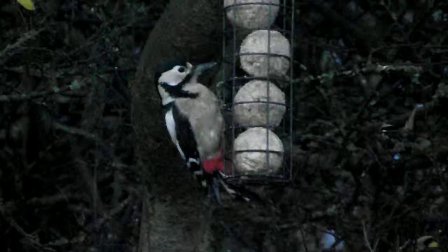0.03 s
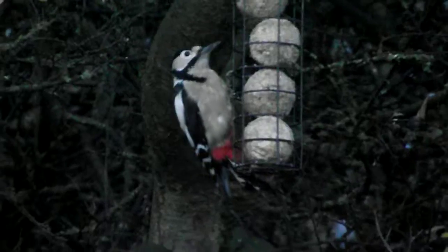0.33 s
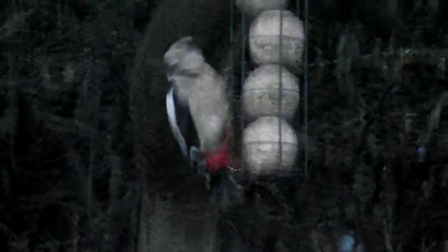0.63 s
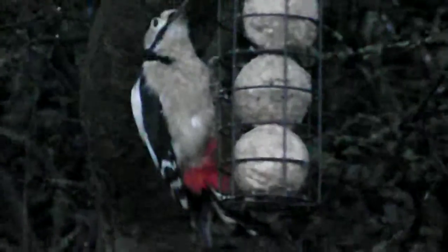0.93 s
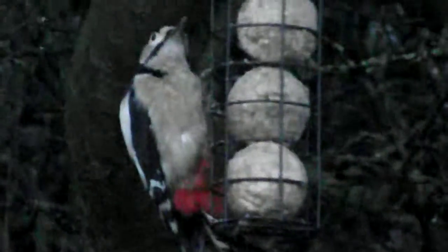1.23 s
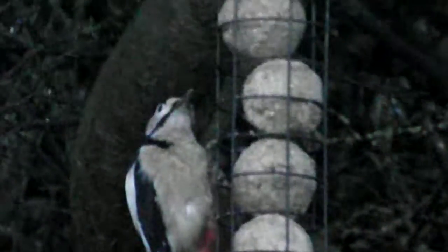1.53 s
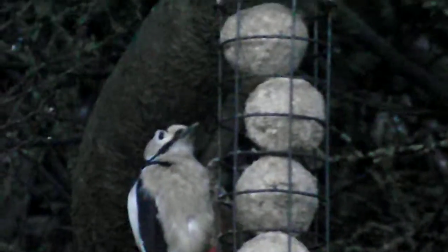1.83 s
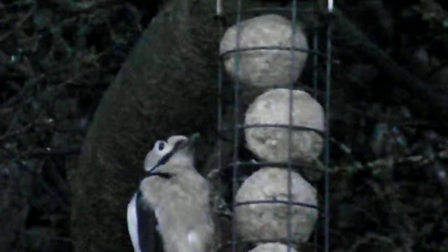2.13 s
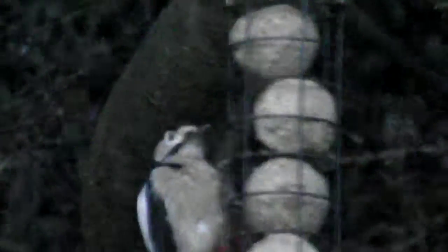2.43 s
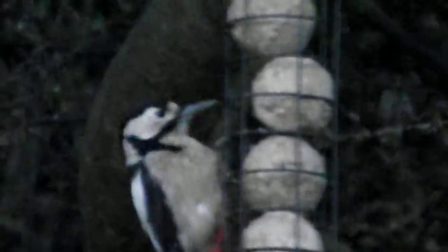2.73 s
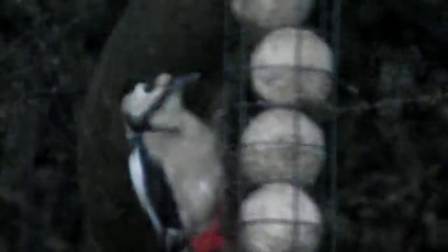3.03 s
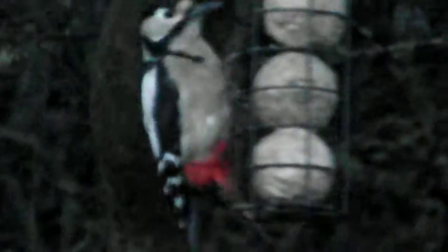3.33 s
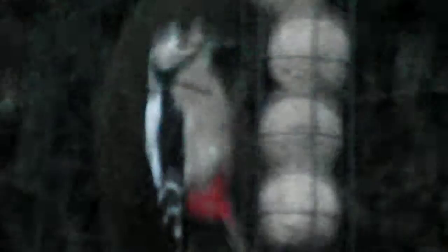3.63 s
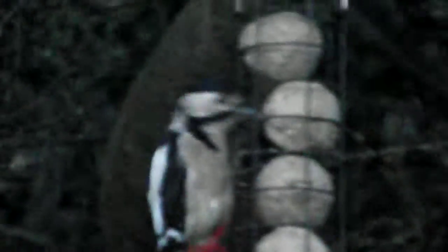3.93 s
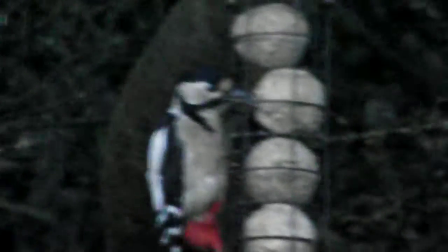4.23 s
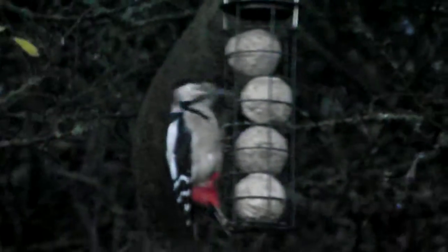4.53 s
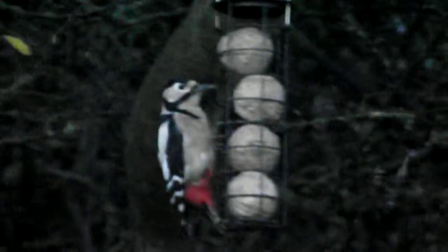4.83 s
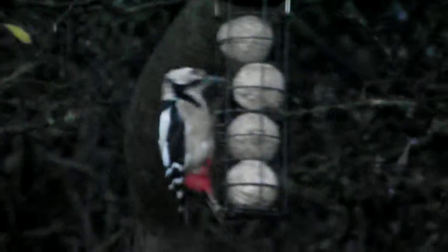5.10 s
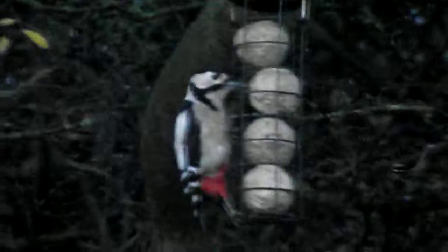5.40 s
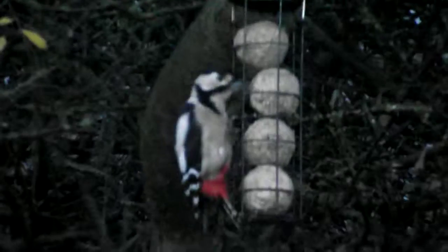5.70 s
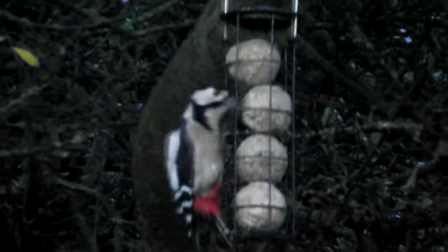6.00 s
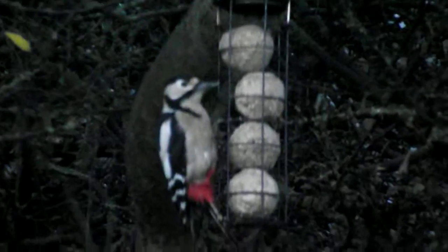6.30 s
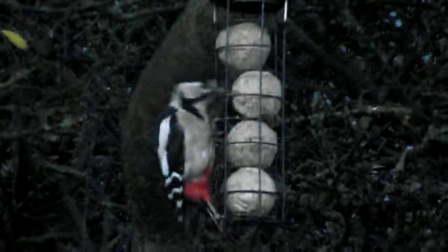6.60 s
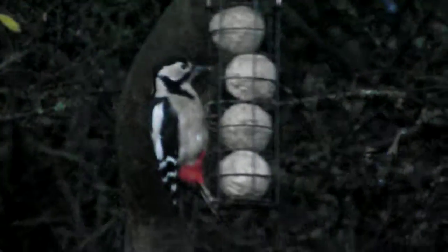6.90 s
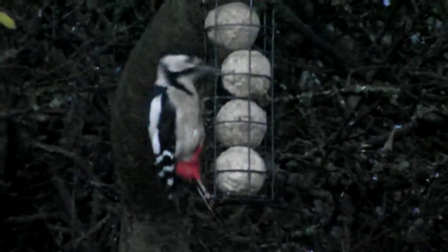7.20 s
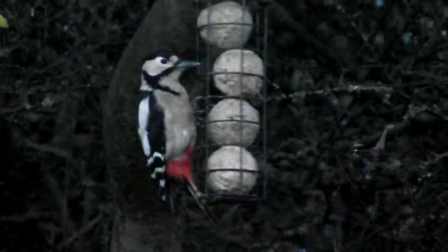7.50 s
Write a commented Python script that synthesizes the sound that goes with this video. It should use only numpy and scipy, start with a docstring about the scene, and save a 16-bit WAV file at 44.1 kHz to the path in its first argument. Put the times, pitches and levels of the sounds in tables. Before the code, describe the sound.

Fingers click irregularly on a camera's housing in quiet woodland, over soft hiss, low rumble and tiny lens motor buzzes.

```python
"""The plastic housing of a handheld camera clicks under the fingers, in quiet woodland.
Each click is a touch and a rebound that ring the housing's modes; the hand also bumps the body softly.
A small lens motor nudges in short runs: its steps hum in the barrel and its gears rattle.
Under it lie the camera's whirring hiss, faint electronics and a low outdoor rumble."""
import sys
import numpy as np
from scipy import signal
from scipy.fft import rfft, irfft
from scipy.io import wavfile
from scipy.ndimage import uniform_filter1d

SR = 44100
rng = np.random.default_rng(int(sys.argv[2]) if len(sys.argv) > 2 else 0)


def log_audio(samples):
    """Write samples as a 16-bit WAV file to the path given in sys.argv[1]."""
    # one column per channel
    frames = np.atleast_2d(samples).T
    # limit to full scale, then quantise
    limited = np.clip(frames, -1, 1)
    pcm = np.round(limited * 32767).astype(np.int16)
    wavfile.write(sys.argv[1], SR, pcm)


N = 332955
TIME_S = np.arange(N) / SR
CLICK_S = 0.006  # a click's level is its energy spread over this time

# housing modes, a list per register (low to high), then one for the crack: freq_hz, width_hz, gain_db
HOUSING_MODES = [
    [(339, 73, -14.5), (660, 790, -12), (1114, 83, 4.5)],
    [(1380, 160, 2), (1599, 127, 8), (1890, 114, 1.5)],
    [(2200, 210, 4.5), (2476, 68, 0.5)],
    [(2853, 180, 5.5), (3153, 167, 3.5), (3404, 370, 0), (4100, 2300, -26)],
    [(5100, 1240, 3), (5900, 450, 2), (6200, 320, 0), (7320, 620, -0.5), (7900, 1200, 0.5),
     (10480, 1000, -4), (12000, 730, 3.5), (13900, 1300, -9)],
]


def from_db(db):
    """Decibels to gain."""
    return 10 ** (np.asarray(db) / 20)


def add(track, start_s, sound):
    """Mix a short sound into a track."""
    at = round(start_s * SR)
    sound, at = sound[max(0, -at):], max(0, at)
    track[at:at + len(sound)] += sound[:max(0, N - at)]


def levelled(sound, rms_db, length_s):
    """Scale to the energy of rms_db held for length_s."""
    return sound * from_db(rms_db) * np.sqrt(length_s * SR / (np.sum(sound ** 2) + 1e-20))


def even(x, over_s):
    """Hold a noise near rms 1."""
    return x / np.sqrt(uniform_filter1d(x ** 2, int(over_s * SR)) + 1e-12)


def resonate(force, modes):
    """Parallel resonances, signs alternating."""
    out = 0
    for k, (freq_hz, width_hz, gain_db) in enumerate(modes):
        r = np.exp(-np.pi * width_hz / SR)
        poles = [1, -2 * r * np.cos(2 * np.pi * freq_hz / SR), r * r]
        gain = (-1) ** k * from_db(gain_db) * (1 - r * r) / 2
        out = out + gain * signal.lfilter([1, 0, -1], poles, force + 1e-18)
    return out


def band(x, low_hz, high_hz, order=2):
    """Causal band-pass."""
    edges_hz = [low_hz, min(high_hz, SR / 2 - 500)]
    return signal.sosfilt(signal.butter(order, edges_hz, "band", fs=SR, output="sos"), x)


def noise(spectrum, peaks=()):
    """Steady noise of a given density, plus bell-shaped resonances."""
    hz = np.maximum(np.arange(N // 2 + 1) * SR / N, 1)
    points_hz, points_db = np.transpose(spectrum)
    power = from_db(np.interp(np.log(hz), np.log(points_hz), points_db, right=-200)) ** 2
    for centre_hz, width_hz, peak_db in peaks:
        power += from_db(peak_db) ** 2 / (1 + ((hz - centre_hz) / width_hz) ** 2 * 2) ** 2
    return irfft(rfft(rng.standard_normal(N)) * np.sqrt(power * SR / 2), N)


def outdoor_rumble(drone_gain_db, rumble_db, swell_share):
    """A low resonance drones and swells; the deep rumble follows a share of the swell."""
    # rumble spectrum: freq_hz, relative_db
    spectrum = [(3, -78), (9, -50.5), (19, -44.5), (27, -46.5), (34, -54.5), (44, -57), (60, -63),
                (72, -75.5), (82, -68.5), (110, -77), (250, -110)]
    # drone resonance: freq_hz, width_hz, gain_db
    mode = [(53.42, 6.6, 0)]
    # drone swell: time_s, relative_db
    envelope = [(0, -47), (0.5, -37), (1.2, -38.5), (2.1, -41.5), (3.3, -40), (4.3, -39), (4.8, -37),
                (5.3, -39), (5.8, -35), (6.35, -38.5), (6.7, -31.5), (7.55, -36.5)]
    swell_db = np.interp(TIME_S, *np.transpose(envelope))
    rumble_gain = from_db(rumble_db + swell_share * (swell_db - swell_db.mean()))
    rumble = rumble_gain * even(noise(spectrum), over_s=0.8)
    drone = resonate(resonate(rng.standard_normal(N + SR), mode), mode)[SR:]
    return rumble + from_db(swell_db + drone_gain_db) * even(drone, over_s=0.2)


def camera_whirr():
    """The camera's own hiss, with narrow resonances and faint steady tones."""
    # hiss spectrum: freq_hz, density_db_per_hz
    hiss = [(80, -91.5), (140, -70.5), (200, -78), (250, -84.5), (450, -86), (620, -83), (1000, -86.5),
            (2000, -87), (3600, -84), (4200, -90), (4600, -101), (7000, -103.5), (12000, -103),
            (16000, -107)]
    # whirr resonances: freq_hz, width_hz, density_db_per_hz
    peaks = [(738, 52, -84), (1152, 50, -83.5), (1374, 220, -85.5), (1757, 64, -80), (1997, 150, -82.5),
             (2557, 180, -77.5), (3136, 140, -74), (4023, 142, -75.5), (4317, 84, -78.5),
             (4750, 500, -91.5)]
    # steady tones: pitch_hz, rms_db
    tones = [(100, -69), (191.5, -62.5)]
    hum = sum(np.sqrt(2) * from_db(db) * np.sin(2 * np.pi * hz * TIME_S) for hz, db in tones)
    return noise(hiss, peaks) + hum


def whine(pitch_hz, rms_db):
    """Line-frequency whine of the camera's electronics."""
    return np.sqrt(2) * from_db(rms_db) * np.sin(2 * np.pi * pitch_hz * TIME_S)


def sizzle(period_s, first_s, length_s, gain_db):
    """A thin sizzle in the camera comes on once a period."""
    gate = uniform_filter1d(1. * ((TIME_S - first_s) % period_s < length_s), SR // 50)
    return gate * from_db(gain_db) * band(rng.standard_normal(N), 9700, 10400)


def hand_bumps(lead_s, decay_s, grains_per_s):
    """Skin and strap shift on the body: short, dull, grainy scuffs."""
    # bumps: time_s, level_db
    bumps = [(2.998, -42), (3.131, -45), (3.547, -39), (3.695, -35.5), (3.813, -37), (3.938, -47)]
    # camera body modes: freq_hz, width_hz, gain_db
    body_modes = [(204, 15, 4.5), (365, 31, 1), (580, 160, -7.5), (1070, 130, -7.5), (1450, 170, -1),
                  (2680, 420, -2.5)]
    out, t = np.zeros(N), np.arange(SR // 8) / SR
    for time_s, level_db in bumps:
        grains = rng.standard_normal(len(t)) * (rng.random(len(t)) < grains_per_s / SR)
        scuff = band(resonate(grains * np.exp(-t / decay_s), body_modes), 120, 6300)
        add(out, time_s - lead_s, levelled(scuff, level_db, decay_s))
    return out


def burst(t, length_s):
    """Rounded window centred in t."""
    return np.exp(-((t - t.mean()) / (length_s / 2)) ** 4)


def lens_motor(step_hz, hum_s, hum_db, rattle_s, rattle_db, lead_s):
    """In each nudge a few uneven motor steps hum in the barrel while the gears rattle."""
    # nudges: time_s, relative_db
    nudges = [(2.352, -36.5), (2.454, -39), (2.551, -35.5), (2.662, -39), (5.167, -39), (5.27, -39.5),
              (5.362, -39), (5.47, -35), (5.535, -36.5), (5.602, -36.5), (5.645, -39), (6.523, -35.5),
              (6.63, -37.5), (6.722, -36), (6.831, -39.5), (6.969, -38), (7.439, -36.5), (7.545, -37)]
    # low barrel modes: freq_hz, width_hz, gain_db
    hum_modes = [(279, 65, 3.5), (484, 72, -0.5)]
    # high barrel modes: freq_hz, width_hz, gain_db
    rattle_modes = [(755, 420, -7.5), (1105, 74, 6), (1400, 58, 1), (3100, 1500, -6)]
    out, t = np.zeros(N), np.arange(SR // 8) / SR
    for time_s, nudge_db in nudges:
        rate_hz = step_hz * (1 + rng.normal(0, 0.03) + rng.normal(0, 0.55, len(t)))
        step_count = np.floor(np.cumsum(rate_hz) / SR)
        steps = np.diff(step_count, prepend=0) * rng.lognormal(0, 0.24, len(t))
        hum = band(resonate(steps * burst(t, hum_s), hum_modes), 170, 710)
        gears = rng.standard_normal(len(t)) * burst(t, rattle_s)
        rattle = band(resonate(gears, rattle_modes), 610, 4200, order=3)
        nudge = levelled(hum, nudge_db + hum_db, hum_s)
        nudge += levelled(rattle, nudge_db + rattle_db, rattle_s)
        add(out, time_s - t.mean() - lead_s, nudge)
    return out


def click_force(t, rebound_s, rebound_db, grit_db, grit_s):
    """A touch, a rebound and brief grit as the parts seat."""
    force = rng.standard_normal(len(t)) * from_db(grit_db) * t / grit_s * np.exp(1 - t / grit_s)
    force[0] += 1
    force[round(rebound_s * SR)] += from_db(rebound_db)
    return force


def metal_ring(force, click_db, crack_db):
    """A tiny metal part rings on faintly after bright, heavy clicks."""
    # metal mode: freq_hz, width_hz, gain_db
    mode = [(5491, 20, -22)]
    heavy_click_db, weight_share = -14.5, 0.6
    ring_db = crack_db + mode[0][2] + weight_share * (click_db - heavy_click_db)
    return levelled(resonate(force, mode), ring_db, CLICK_S)


def housing_crack(force, crack_db, gain_db):
    """The top modes crack; the harder the contact, the higher they reach."""
    soft_reach_hz, extra_reach_hz, hard_crack_db = 6450, 7000, -24.5
    reach_hz = soft_reach_hz + extra_reach_hz * from_db(crack_db - hard_crack_db)
    crack = band(resonate(force, HOUSING_MODES[-1]), 3700, reach_hz)
    return levelled(crack, crack_db + gain_db, CLICK_S)


def housing_ring(force, click_db, tilt_db_per_oct, rebound_s):
    """Contact brightness and rebound timing share the energy among the housing's registers."""
    # registers: low_hz, high_hz, centre_hz, relative_db
    registers = [(280, 1970, 1120, -10), (1230, 1960, 1610, 0.5), (1800, 2510, 2184, -2),
                 (2370, 4320, 2988, -4)]
    low_hz, high_hz, centre_hz, register_db = np.transpose(registers)
    in_step_db = 5 * np.cos(2 * np.pi * centre_hz * rebound_s)  # rebound lifts in step, damps out of it
    share_db = register_db + tilt_db_per_oct * np.log2(centre_hz / centre_hz[0]) + in_step_db
    share_db -= 10 * np.log10(np.sum(from_db(share_db) ** 2))
    return sum(levelled(band(resonate(force, modes), low, high), click_db + share, CLICK_S)
               for modes, low, high, share in zip(HOUSING_MODES, low_hz, high_hz, share_db))


def housing_clicks(tail_db, tail_s, edge_db):
    """Fingers click the housing: ring, crack, the bare contact's sharp edge and a trace of metal."""
    # clicks: start_s, relative_db, tilt_db_per_oct, crack_offset_db, rebound_s
    clicks = [(0.0025, -27.5, -3, -20, 0.0011), (0.0129, -33, -3, -25, 0.00078),
              (0.3751, -30, -7.5, -19, 0.00035), (0.4326, -18.0, -0.5, -13.5, 0.00034),
              (0.4634, -22.5, 9, -20, 0.00079), (0.6959, -13, 2.5, -10.5, 0.00098),
              (1.0119, -20.5, 2.5, -6.5, 0.00086), (1.03, -32.5, 1.5, -29, 0.00098),
              (1.353, -28.5, -4, -38, 0.0012), (1.4024, -28, 0, -29, 0.0006),
              (1.4098, -28.5, -10, -26, 0.0004), (1.4156, -19, -4.5, -39, 0.00129),
              (1.4414, -37.0, -7.0, -28, 0.00095), (1.4813, -29.5, -11.0, -38, 0.0012),
              (1.514, -36.5, -5, -25, 0.00076), (1.939, -39, 0, -26, 0.00088),
              (2.9165, -33.5, 8, -34, 0.00051), (2.988, -36.5, -4.5, -34, 0.00048),
              (3.0122, -36.5, -8, -32, 0.00062), (3.115, -30, 1, -14.5, 0.00074),
              (3.1201, -36, -7, -24, 0.00096), (3.1256, -32, -19, -24, 0.00045),
              (3.1324, -32.5, -4, -22, 0.00103), (3.2299, -13.0, 8, -18, 0.00062),
              (3.3847, -11.0, 1.0, -23, 0.00092), (3.41, -37, -8.0, -37, 0.001),
              (4.2672, -35.0, -10, -28, 0.00071), (4.6465, -29, -4, -24, 0.00077),
              (4.659, -21, 5, -13, 0.00082), (4.6657, -16.5, 4.5, -31, 0.00117),
              (4.991, -28, 0, -37, 0.00078), (5.033, -32.0, -11, -36, 0.00076),
              (5.1003, -22.5, -3, -30, 0.0013), (5.1079, -19.0, 5.5, -26.5, 0.0011),
              (5.18, -35, -3.0, -33, 0.0012), (5.3231, -13.5, 4, -29.5, 0.00049),
              (7.1558, -24, 10.5, -22, 0.00067), (7.1667, -25.5, 3, -35, 0.0007),
              (7.1754, -35, 0.5, -31, 0.00119), (7.196, -27, 0, -37, 0.00051),
              (7.2017, -22.5, -3.5, -34, 0.0011), (7.2039, -22, 6, -31, 0.00066),
              (7.3465, -35.5, -9, -24, 0.001), (7.4357, -34, -1, -26, 0.00062)]
    out, t = np.zeros(N), np.arange(SR // 8) / SR
    for start_s, click_db, tilt_db_per_oct, crack_offset_db, rebound_s in clicks:
        force = click_force(t, rebound_s, rebound_db=-3, grit_db=-17, grit_s=0.00094)
        rattle = rng.standard_normal(len(t)) * from_db(tail_db) * np.exp(-t / tail_s)
        ring = housing_ring(force + rattle, click_db, tilt_db_per_oct, rebound_s)
        crack_db = click_db + crack_offset_db
        crack = housing_crack(force, crack_db, gain_db=-1)
        edge = levelled(band(force, 9000, 15200), crack_db + edge_db, CLICK_S)
        add(out, start_s, ring + crack + edge + metal_ring(force, click_db, crack_db))
    return out


def scene():
    """One mix on both channels, the left one sample later."""
    clicks = from_db(0.48) * housing_clicks(tail_db=-32, tail_s=0.0078, edge_db=-13.5)
    motor = lens_motor(step_hz=245.3, hum_s=0.018, hum_db=-3.5, rattle_s=0.03, rattle_db=-5, lead_s=0.003)
    electronics = sizzle(period_s=0.99, first_s=0.16, length_s=0.28, gain_db=-57.5)
    electronics += whine(pitch_hz=15725, rms_db=-78)
    bumps = hand_bumps(lead_s=0.0064, decay_s=0.014, grains_per_s=3000)
    rumble = outdoor_rumble(drone_gain_db=-1.5, rumble_db=-32.5, swell_share=0.15)
    mono = rumble + camera_whirr() + electronics + bumps + motor + clicks
    left = np.concatenate([[0], mono[:-1]])
    return np.array([left, mono])


def record(dry):
    """Steep low-pass at 15950 Hz."""
    return signal.sosfilt(signal.ellip(10, 0.1, 80, 15950, fs=SR, output="sos"), dry)


dry = scene()
out = record(dry)
log_audio(out)
```